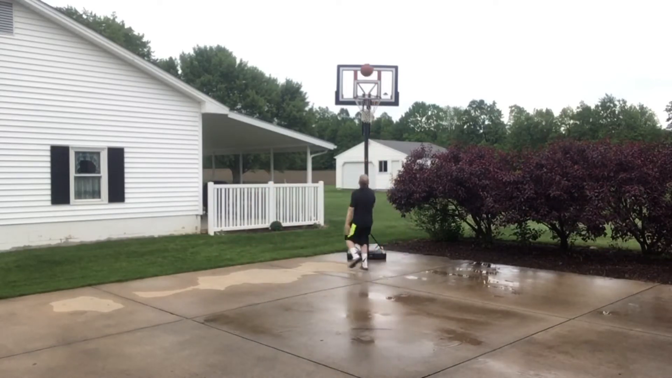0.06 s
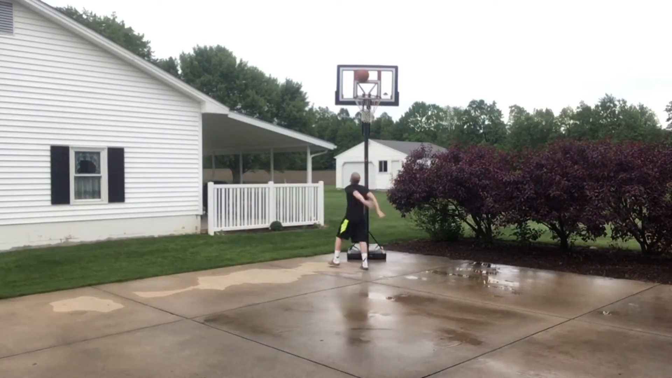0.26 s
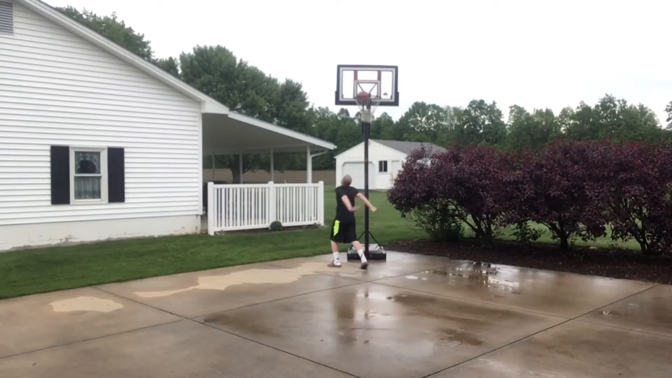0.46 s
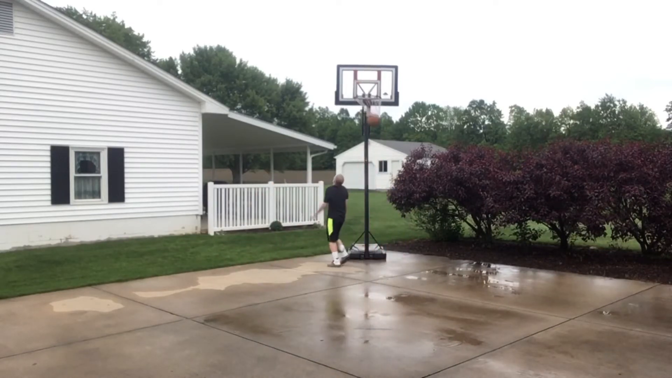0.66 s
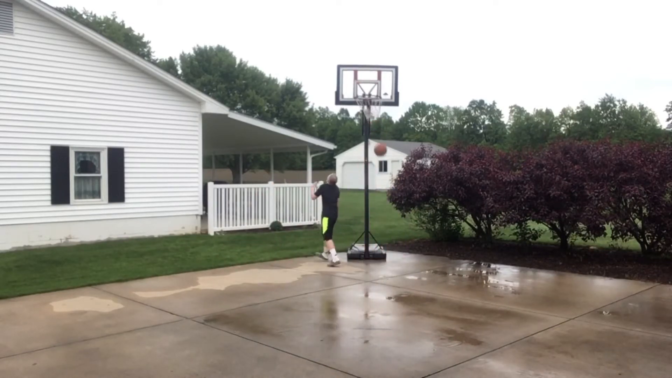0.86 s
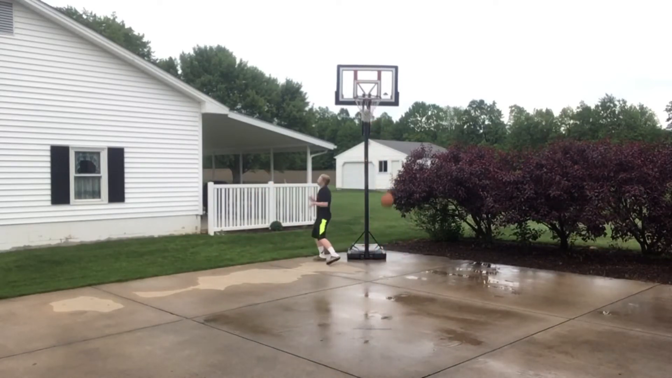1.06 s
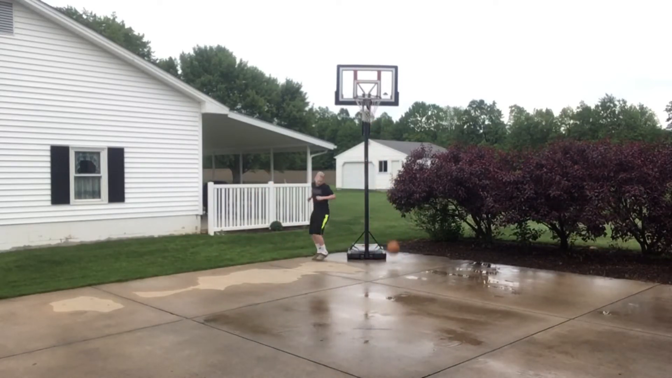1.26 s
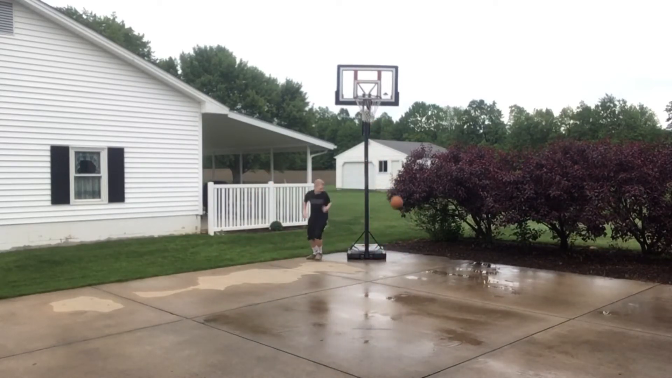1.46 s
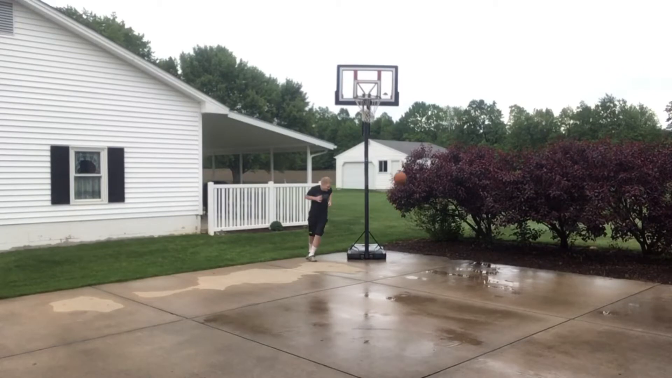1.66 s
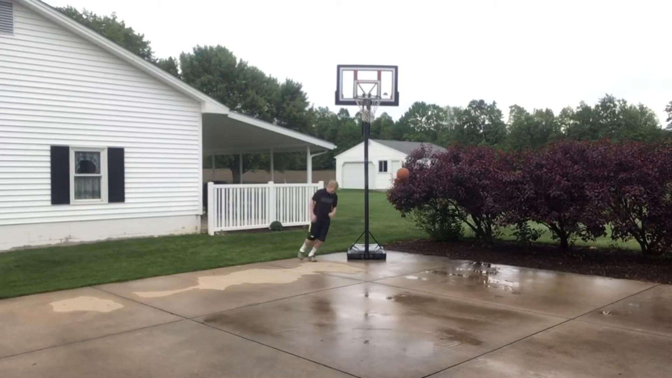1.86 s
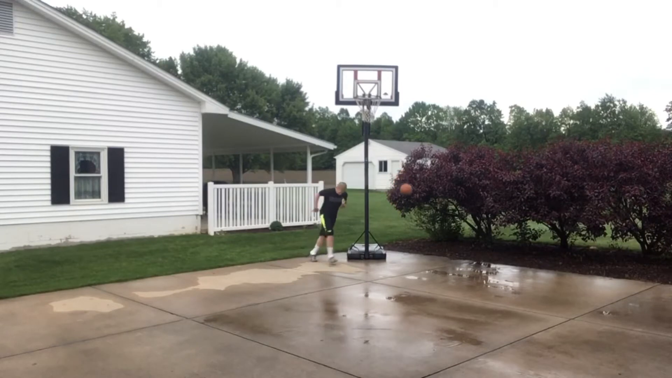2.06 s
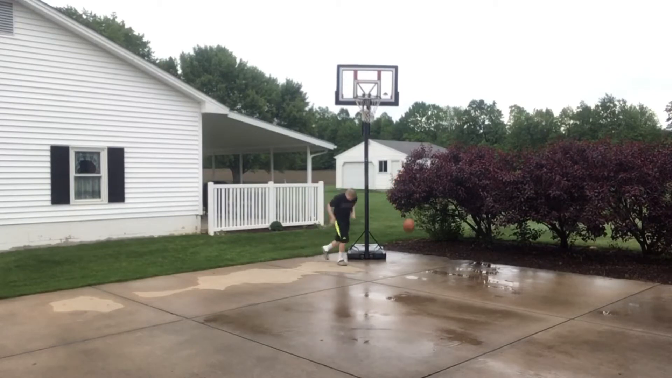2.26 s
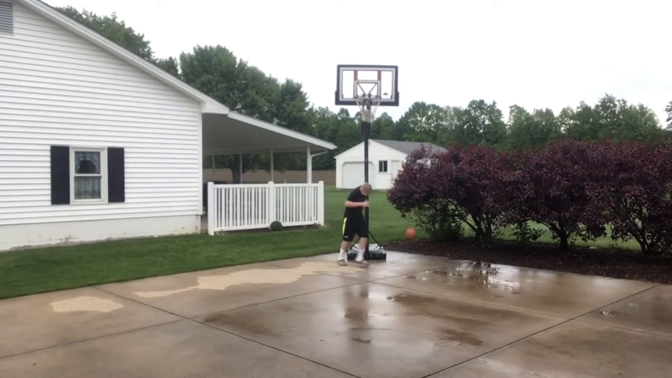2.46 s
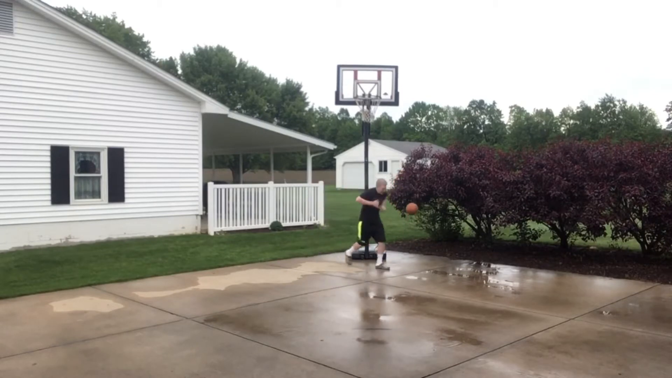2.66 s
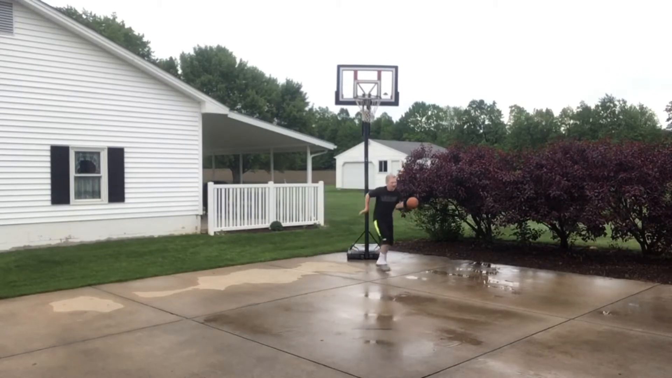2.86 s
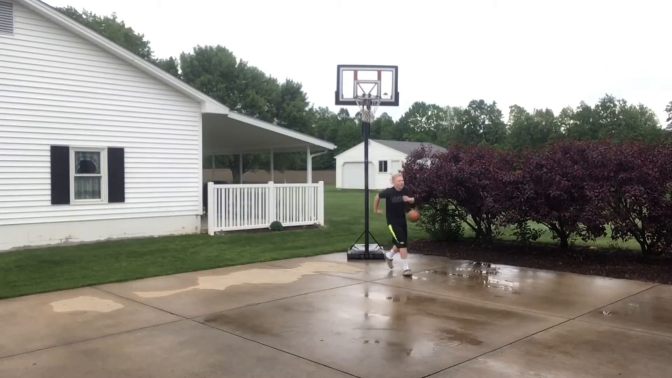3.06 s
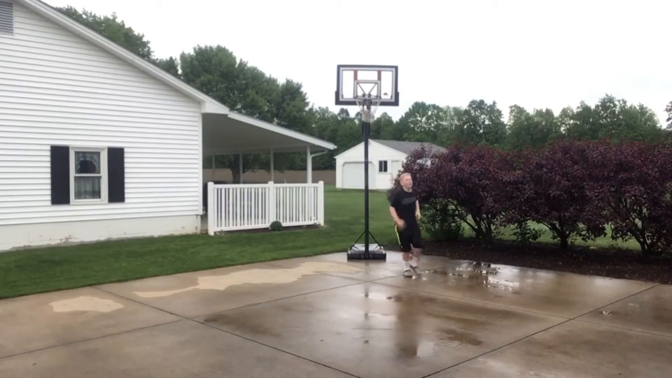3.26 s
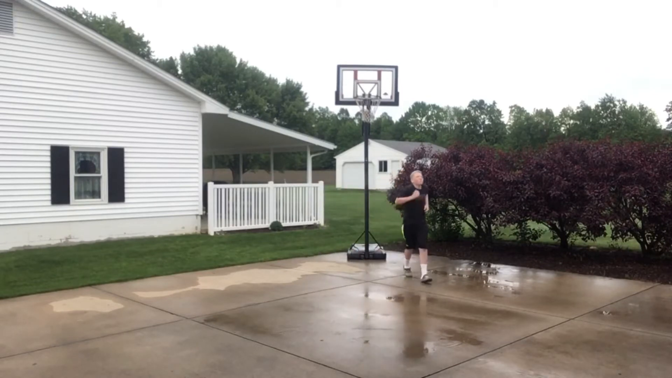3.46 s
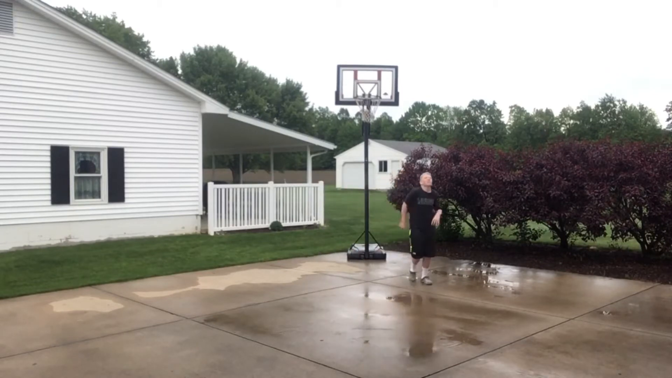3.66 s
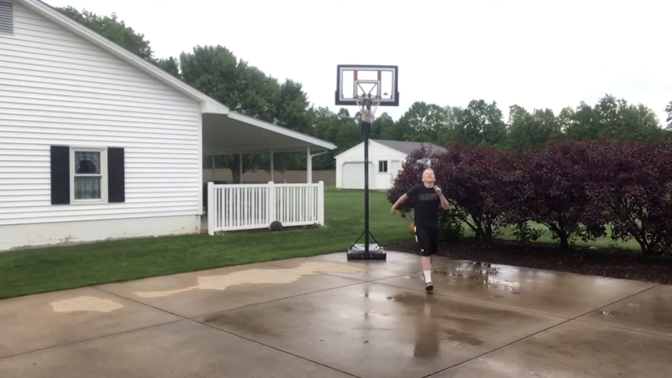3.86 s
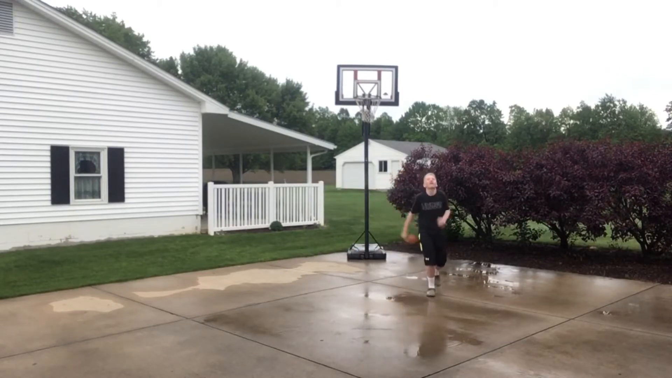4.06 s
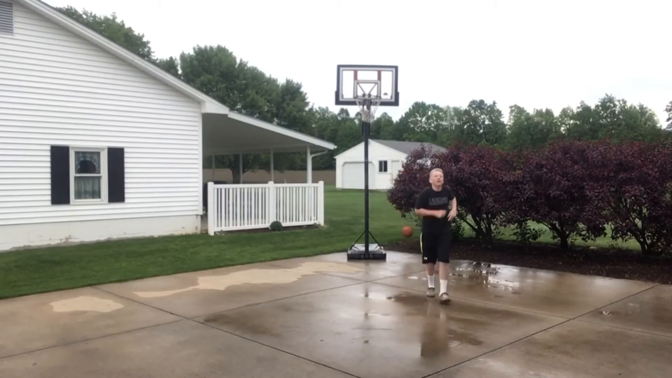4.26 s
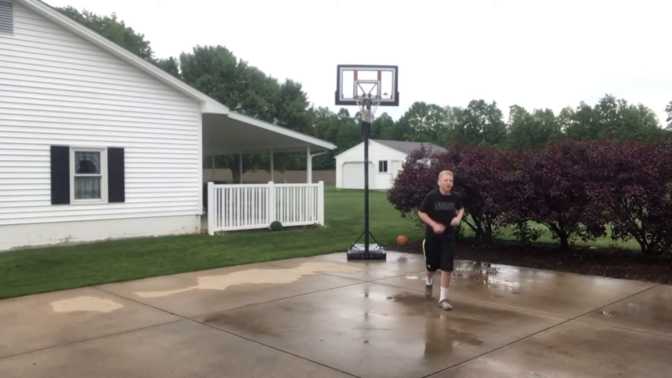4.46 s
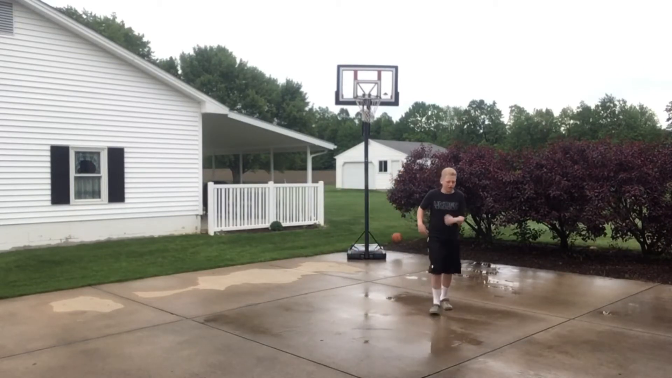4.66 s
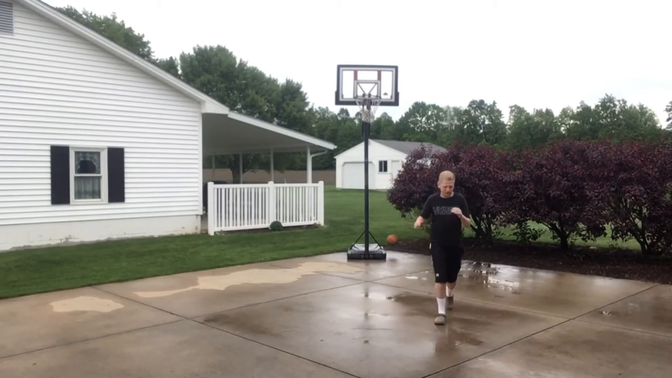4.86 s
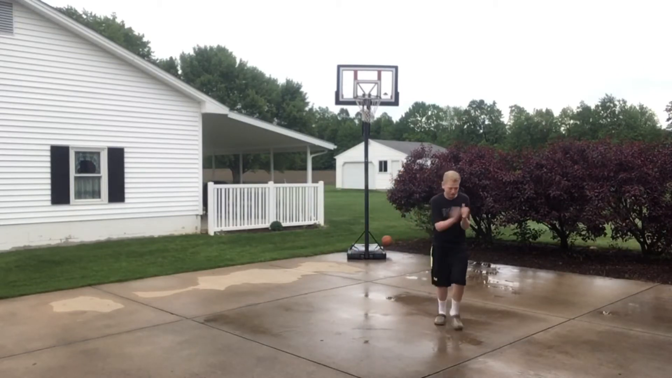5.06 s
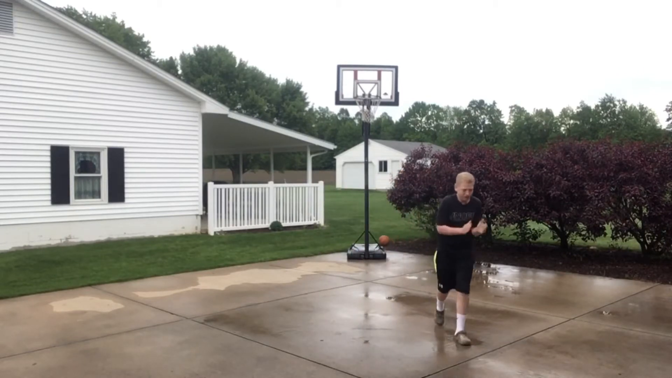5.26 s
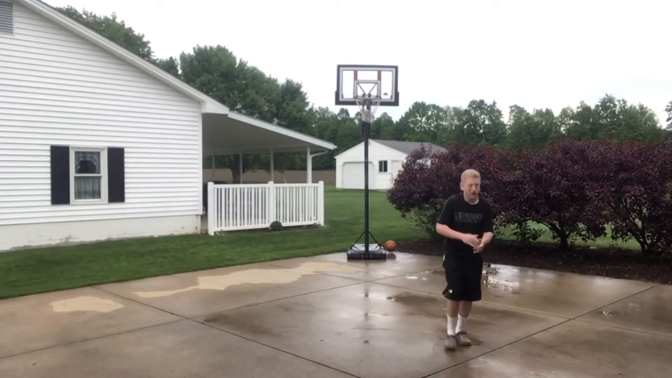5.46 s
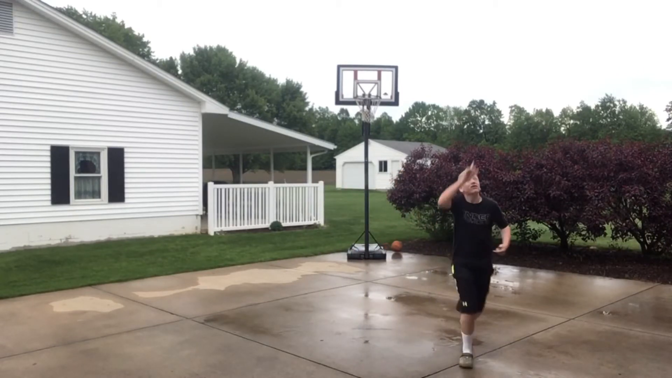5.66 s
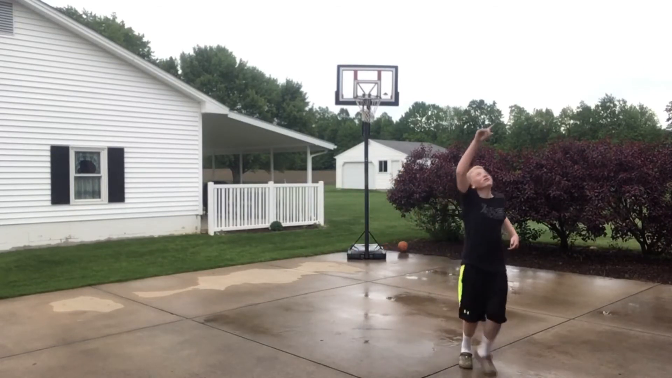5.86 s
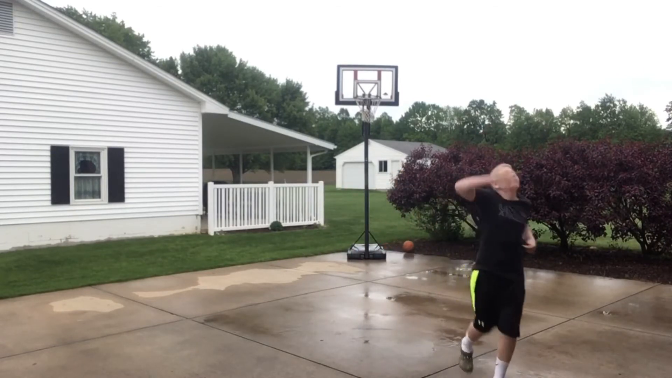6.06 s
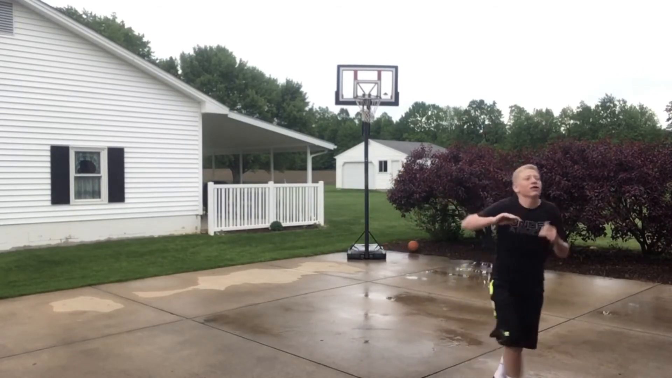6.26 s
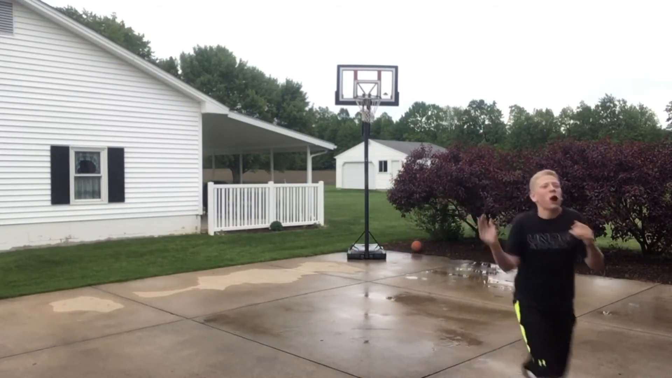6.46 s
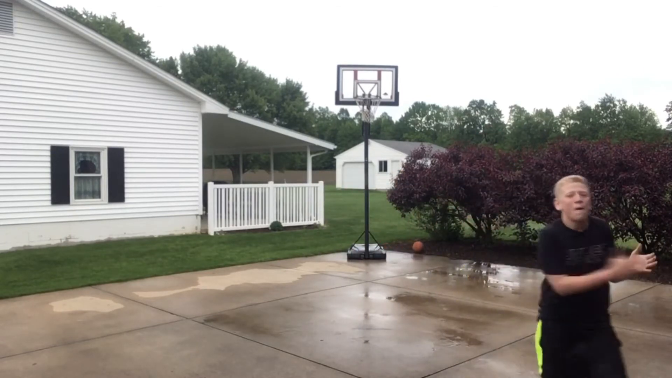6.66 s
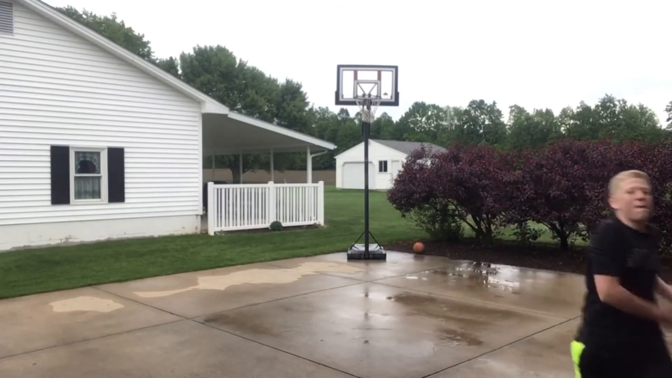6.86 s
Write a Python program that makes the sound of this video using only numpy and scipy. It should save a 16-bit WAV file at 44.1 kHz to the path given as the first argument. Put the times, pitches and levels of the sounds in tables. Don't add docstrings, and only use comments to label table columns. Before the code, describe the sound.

Open yard beside a house, heard from one fixed spot. First a distant board thud with loose metal rattle and a faint net brush, then a loud wet ball slap with quick echoes and progressively softer bounces. Shoes crunch grit, growing nearer and louder. Two popping hand claps echo off the walls, and a last crisp clap comes late. Far birds chirp above a wavering low hum and soft hiss.

```python
import sys
import numpy as np
from scipy import signal
from scipy.fft import rfft, irfft
from scipy.io import wavfile
from scipy.ndimage import map_coordinates

SR = 44100
rng = np.random.default_rng(int(sys.argv[2]) if len(sys.argv) > 2 else 0)


def undo_db(level):
    steps = np.asarray(level, float) / 20
    return 10 ** steps


def file_out(sig):
    cols = np.atleast_2d(sig).T
    lim = np.clip(cols, -1, 1)
    pcm = np.round(lim * 32767).astype(np.int16)
    wavfile.write(sys.argv[1], SR, pcm)


N = 305172
TIME = np.arange(N) / SR
SIZE = 2 ** 19
HZ = np.maximum(np.arange(SIZE // 2 + 1) * SR / SIZE, 1)


def noise():
    return rng.standard_normal(N)


def rms_one(x):
    return x / np.sqrt(np.mean(x ** 2) + 1e-30)


def at_hz(points, hz, column=1):
    points = np.array(points)
    return np.interp(np.log(hz), np.log(points[:, 0]), points[:, column])


def coloured(x, spectrum):
    cepstrum = irfft(np.log(undo_db(at_hz(spectrum, HZ[::64]))))
    cepstrum[1:4096] *= 2
    cepstrum[4097:] = 0
    response = irfft(np.exp(rfft(cepstrum)))
    return signal.oaconvolve(x, response / np.sqrt(np.sum(response ** 2)))[:N]


def clicks(seconds, db):
    out = np.zeros(N)
    out[(np.asarray(seconds) * SR).astype(int)] = undo_db(np.asarray(db))
    return out


def ring(seconds, db, modes, scatter_db, contact_hz):
    out = np.zeros(N)
    soft = np.exp(-2 * np.pi * contact_hz / SR)
    luck = rng.standard_normal((len(seconds), len(modes)))
    for k, (hz, level_db, t60) in enumerate(modes):
        r = undo_db(-60 / (t60 * SR))
        w = 2 * np.pi * hz / SR
        blows = clicks(seconds, db + level_db + scatter_db * luck[:, k])
        out += signal.lfilter([0, np.sin(w)], [1, -2 * r * np.cos(w), r * r], blows + 1e-18)
    return signal.lfilter([(1 - soft) ** 2], [1, -2 * soft, soft * soft], out)


def bursts(seconds, db, lengths, rise):
    out = np.zeros(N)
    for s, level_db, length in np.broadcast(seconds, db, lengths):
        at = int(s * SR)
        length = max(length, 2e-4)
        t = np.arange(min(int(8 * length * SR), N - at)) / SR / length
        out[at:at + len(t)] += undo_db(level_db) * (1 - np.exp(-t / rise)) * np.exp(-t)
    return out


def drift(rate):
    knots = rng.standard_normal(400)
    return map_coordinates(knots, [TIME * rate + 2], order=3)


def narrow(x, hz, width):
    r = np.exp(-np.pi * width / SR)
    return signal.lfilter([(1 - r * r) / 2, 0, (r * r - 1) / 2], [1, -2 * r * np.cos(2 * np.pi * hz / SR), r * r], x)


# time in seconds, level in dB.
MOTOR_SWELLS = [(0, -49), (.54, -51), (.71, -59), (1.12, -48.5), (1.27, -54), (1.48, -47.5), (1.73, -56),
                (2.03, -46.5), (2.51, -59), (2.85, -50), (3.24, -46), (3.49, -49), (3.7, -59),
                (3.99, -58.5), (4.28, -52.5), (4.86, -45.5), (5.32, -54), (6.42, -50.5)]
# pitch in Hz, level in dB, width in Hz.
MOTOR_OVERTONES = [(174.5, -69.5, 5.5), (339.3, -74, 4.1), (962.7, -72, 4.4), (1181, -76, 38)]
# frequency in Hz, level in dB per Hz.
RUMBLE_COLOUR = [(25, -43), (40, -7.5), (55, 18.5), (75, 3), (110, 8), (160, -8), (250, -39.5)]
# frequency in Hz, level in dB per Hz.
AIR_COLOUR = [(100, -24.5), (200, 0), (400, -3.5), (700, -4), (1100, -11.5), (1700, -17), (3000, -21),
              (4400, -22), (5500, -33), (6500, -31), (7900, -23.5), (9500, -31), (12000, -47.5),
              (16000, -76.5)]
# time in seconds, level in dB.
AIR_SWELLS = [(0, -61), (1, -63.5), (2, -63), (3, -64), (4, -65), (5, -62.5), (6, -61), (6.92, -63)]


def background():
    hum_db = np.interp(TIME, *np.transpose(MOTOR_SWELLS))
    rumble_db = -58.5 - 0.13 * (hum_db + 45)
    phase = 2 * np.pi * np.cumsum(84 + 0.64 * drift(5.4)) / SR
    hum = undo_db(hum_db + 1.5 + 0.55 * drift(11.0)) * np.sin(phase)
    overtones = sum(undo_db(db) * rms_one(narrow(noise(), hz, width)) for hz, db, width in MOTOR_OVERTONES)
    rumble = undo_db(rumble_db + 4.0) * coloured(noise(), RUMBLE_COLOUR)
    air_db = np.interp(TIME, *np.transpose(AIR_SWELLS)) + 1.0 * drift(39)
    return hum + overtones + rumble + undo_db(air_db) * coloured(noise(), AIR_COLOUR)


def whistles(calls, smear_hz, clear):
    out, white = np.zeros(N), noise()
    for s, length, hz, db, rise_hz in calls:
        at = int(s * SR)
        share = np.linspace(0, 1, int(length * SR))
        phase = 2 * np.pi * np.cumsum(hz + rise_hz * share) / SR
        blur = signal.lfilter(*signal.butter(2, smear_hz, fs=SR), white[at - 4000:at + len(share)])[4000:]
        swell = np.sqrt(np.sin(np.pi * share) + 1e-9)
        out[at:at + len(share)] += undo_db(db) * swell * np.sin(phase) * (clear + rms_one(blur))
    return out


# start in seconds, length in seconds, first pitch in Hz, level in dB, rise in Hz.
HELD_NOTES = [(.39, 0.032, 2790, -70, 5), (1.46, 0.16, 2800, -70.5, -18), (1.64, 0.25, 2810, -79.5, 1),
              (3.57, 0.14, 3170, -72, 28), (3.66, 0.16, 6240, -87, 0), (3.67, 0.12, 7260, -85, 12),
              (6.1, 0.16, 2954, -77, -54)]
RISING_CHIRPS = [(1.8, 0.067, 3180, -67, 150), (1.86, 0.1, 3430, -69, 450), (2.09, 0.059, 2860, -68, 1010),
                 (2.964, 0.24, 3020, -74.5, 574), (3.17, 0.1, 4320, -73, 990), (3.23, 0.13, 4700, -78, 690),
                 (6.26, 0.12, 2854, -67.5, 1000), (6.52, 0.4, 2850, -68.5, 1153)]
ROUGH_CHATTER = [(3.69, 0.23, 4020, -68.5, 341), (4.049, 0.11, 4350, -66.5, -750),
                 (4.279, 0.075, 3430, -71.5, 134)]


def birds():
    held = whistles(HELD_NOTES, smear_hz=27.7, clear=1.9)
    chirps = whistles(RISING_CHIRPS, smear_hz=172, clear=0.25)
    return held + chirps + whistles(ROUGH_CHATTER, smear_hz=523, clear=0)


# start in seconds, length in seconds, level in dB.
SHOE_ROLLS = [(0.974, 0.051, -51), (1.071, 0.027, -56), (1.174, .025, -47.5), (1.224, 0.058, -53),
              (1.56, 0.18, -59.5), (2.223, 0.032, -54.5), (2.645, 0.05, -51.5), (2.813, 0.014, -60),
              (3.061, 0.036, -45), (3.137, 0.0078, -46), (3.511, 0.041, -46), (3.571, 0.041, -53),
              (3.953, 0.016, -50.5), (3.979, 0.028, -47.5), (4.39, 0.043, -46), (4.462, 0.02, -49.5),
              (4.825, 0.052, -40.5), (5.033, 0.0068, -42), (5.3, 0.019, -40), (5.628, 0.029, -37),
              (5.705, 0.02, -47.5), (5.754, 0.0036, -48.5), (5.926, 0.016, -37.5), (5.991, 0.062, -35),
              (6.063, 0.059, -44.5), (6.4, 0.024, -54), (6.439, 0.015, -36), (6.546, .025, -59),
              (6.897, 0.016, -38)]
# start in seconds, level in dB.
SOLE_SCUFFS = [(4.622, -52), (5.2445, -32), (5.27, -40.5), (5.334, -37.5), (5.521, -36), (5.7534, -58),
               (5.796, -48.5)]
# time in seconds, level in dB.
STONE_SNAPS = [(3.085, -27), (4.61, -22.5), (4.855, -21.5), (5.929, -20), (6.077, -41.5), (6.9047, -18.5)]
# frequency in Hz, level in dB per Hz.
GRIT_COLOUR = [(1470, -25.5), (2500, -6), (3190, -7.5), (4300, -3.5), (5790, -13), (6640, -4), (8160, 4),
               (9080, -2.5), (10200, -8.5), (15500, -30.5)]
# frequency in Hz, level in dB per Hz.
SOLE_COLOUR = [(200, -23), (600, 1), (1500, 8), (2500, 7.5), (3500, -15), (5000, -29)]


def steps():
    tread = 0
    for s, length, db in SHOE_ROLLS:
        press = np.clip((TIME - s) / 0.0044, 0, 1)
        lift = np.exp(-np.maximum(TIME - s - length, 0) / 0.0058)
        tread = tread + undo_db(db) * press * lift
    tread = tread * undo_db(3.0 * drift(57))
    drag = bursts(*np.transpose(SOLE_SCUFFS), 0.018, rise=0.138)
    strength = undo_db(5.9 * np.minimum(rng.exponential(1, N), 4))
    grains = strength * (rng.random(N) < 4000 / SR) * rng.choice([-1, 1], N)
    grains = rms_one(grains) + 0.11 * noise()
    cracking = undo_db(-12.0) * (tread + undo_db(-7) * drag) * grains
    crunch = coloured(cracking + clicks(*np.transpose(STONE_SNAPS)), GRIT_COLOUR)
    return crunch + coloured(undo_db(-10.0) * (undo_db(-13.5) * tread + drag) * grains, SOLE_COLOUR)


# time in seconds, peak in dB, hollow of the palms in Hz, bright edge in dB, wall echo in dB.
HAND_CLAPS = [
    (5.1369, -4, 1300, -22, -5.5),
    (5.3819, -7.5, 1510, -20, -12),
    (6.7372, -11.5, 2010, -4.5, -44),
]
# frequency in Hz, level in dB per Hz.
PALM_COLOUR = [(200, -29.5), (400, -9), (550, -3), (860, -7.5), (1200, -0.5), (2200, -2), (2800, -11.5),
               (4500, -16.5), (7000, -23)]
# frequency in Hz, level in dB per Hz.
SKIN_COLOUR = [(2500, -13), (4500, -9.5), (6000, -12.5), (7800, -3), (10000, -11.5), (13000, -14.5),
               (16000, -44)]


def claps():
    out, wall, plain = np.zeros((3, N))
    for s, db, hz, edge_db, echo_db in HAND_CLAPS:
        echo_s = (17.1 + 2.6 * (s - HAND_CLAPS[0][0])) / 343
        closing = bursts([s - .004], db - 18, 0.0023, rise=1.1) * noise()
        puff = coloured(clicks([s], db + 9.5) + closing, PALM_COLOUR)
        pop = 0.92 * puff + 0.78 * narrow(puff, hz, width=2000)
        rub = bursts([s - .0015], db + edge_db + 8.0, 0.0014, rise=0.3) * noise()
        out += pop + coloured(clicks([s], db + edge_db + 14) + rub, SKIN_COLOUR)
        wall += undo_db(echo_db + 4) * np.roll(narrow(pop, hz, width=800), int(echo_s * SR))
        plain += coloured(clicks([s], db + 12), PALM_COLOUR)
        plain += coloured(clicks([s], db + edge_db + 16.5), SKIN_COLOUR)
    return out, wall, plain


# time in seconds, then board, stand and rattle levels in dB.
HOOP_KNOCKS = [
    (0.281, -17, -44, -34),
    (0.313, -29, -25.5, -55),
    (0.353, -44, -32, -72),
    (0.384, -33.5, -31.5, -56),
    (0.521, -41, -38.5, -49),
    (0.611, -45.5, -34.5, -56),
    (0.858, -46.5, -50.5, -84),
]
# pitch in Hz, level in dB, time to fade by 60 dB in seconds.
BOARD_MODES = [(259, -4, 0.098), (278, 1, 0.065), (348, -7.5, 0.07), (569.6, -14, 0.11), (695, -22, 0.12),
               (805, -12, 0.032)]
STAND_MODES = [(51.6, -3.5, 0.83), (108, -3.5, 1), (132, -23, 0.2), (158, -4.5, 0.23), (177, -6.5, 0.12)]
# frequency in Hz, level in dB per Hz.
RATTLE_COLOUR = [(290, -8.5), (500, -18.5), (646, -12), (859, -25.5), (1300, -21), (4050, -36), (5620, -43),
                 (7580, -43.5), (15000, -73)]
# start in seconds, length in seconds, level in dB.
NET_BRUSHES = [
    (0.303, 0.018, -56.5),
    (0.337, 0.096, -63),
    (0.42, 0.34, -66),
]
# time in seconds, level in dB, length in seconds.
RIM_BUZZES = [
    (0.631, -54, 0.027),
    (0.863, -52.5, 0.011),
]


def hoop():
    s, board_db, stand_db, rattle_db = np.transpose(HOOP_KNOCKS)
    board = ring(s, board_db - 5, BOARD_MODES, scatter_db=0.0, contact_hz=406)
    stand = ring(s, stand_db, STAND_MODES, scatter_db=2.0, contact_hz=250)
    rattle = coloured(bursts(s, rattle_db, 0.041, rise=0.01) * noise(), RATTLE_COLOUR)
    brush = sum(undo_db(db) * np.sin(np.pi * np.clip((TIME - s) / length, 0, 1)) for s, length, db in NET_BRUSHES)
    net = coloured(brush * undo_db(1.1 * drift(30.2)) * noise(), GRIT_COLOUR)
    shiver = bursts(*np.transpose(RIM_BUZZES), rise=0.44) * rms_one(narrow(noise(), 1480, width=300))
    return board + stand + rattle + shiver + net


# time in seconds, slap peak in dB, thump in dB, ring of the air inside in dB.
BALL_BOUNCES = [
    (1.297, -1, -24, -22),
    (2.4416, -9, -25.5, -32.5),
    (3.3438, -16, -37, -37),
    (4.0712, -31, -40.5, -34),
    (4.5975, -30.5, -41, -39.5),
    (5.0304, -25, -45.5, -48.5),
]
# frequency in Hz, level in dB per Hz.
SLAP_COLOUR = [(200, -29.5), (400, -5), (1200, -6), (2500, -6), (4300, -10), (6000, -12.5), (8000, -8),
               (10000, -17), (13000, -35.5), (16000, -60.5)]
# pitch in Hz, level in dB, time to fade by 60 dB in seconds.
SQUASH_MODES = [(101, -0.5, 0.14), (140.7, 0, 0.1), (213, -23.5, 0.08)]
INNER_AIR_MODES = [(450, -3, 0.049), (654, 0.5, 0.024), (1171, -7.5, 0.03), (1322, -11, 0.053),
                   (1636, 4.5, 0.0061), (2230, -2, 0.015)]


def bounces():
    s, slap_db, thump_db, air_db = np.transpose(BALL_BOUNCES)
    s = s + 0.00065
    slap = clicks(s, slap_db + 2) - clicks(s + .0005, slap_db - 12)
    spray = bursts(s, slap_db - 28.5, 0.018, rise=0.026) * noise()
    thump = ring(s, thump_db + 4.5, SQUASH_MODES, scatter_db=6.0, contact_hz=511)
    ping = ring(s, air_db - 4, INNER_AIR_MODES, scatter_db=1.5, contact_hz=5070)
    return coloured(slap, SLAP_COLOUR) + coloured(spray, GRIT_COLOUR) - thump + ping


# frequency in Hz, level in dB, time to fade by 60 dB in seconds.
SCATTERING = [(101, -2.5, 0.78), (310.5, 8.5, 0.25), (1223, 3, 0.65), (2410, -2, 0.69), (5000, -6, 0.72),
              (9000, -9, 0.68), (15040, -4.5, 0.54)]


def yard(x, scattered, echoes, scatter_db):
    path, tail = 1, 0
    t = TIME[:SR]
    for s, db, hz, breadth in echoes:
        damping = 1j * HZ / hz * breadth
        wall_colour = (damping / (1 + damping - (HZ / hz) ** 2)) ** 2
        path = path + undo_db(db) * np.exp(-2j * np.pi * HZ * s) * wall_colour
    edges = 50 * 2 ** np.arange(0, 8.6, .5)
    early = undo_db(13.0 - 60 * t / 0.044)
    for low, high in zip(edges, edges[1:]):
        half_octave = signal.butter(2, [low, high], "band", fs=SR, output="sos")
        band = signal.sosfilt(half_octave, rng.standard_normal(SR))
        hz = np.sqrt(low * high)
        late = undo_db(-60 * t / at_hz(SCATTERING, hz, column=2))
        tail = tail + band * undo_db(at_hz(SCATTERING, hz)) * (early + late)
    tail = tail * (1 - np.exp(-t / 0.0012))
    direct = rfft(x, SIZE) * path
    return irfft(direct + rfft(scattered, SIZE) * undo_db(scatter_db) * rfft(tail, SIZE))[:N]


# delay in seconds, level in dB, centre in Hz, breadth as a share of the centre.
WALLS_FROM_BALL = [(0.0275, -11, 2400, 2.5), (.066, -4, 1600, 0.8), (.077, -10, 1550, 0.8),
                   (0.07, -6, 110, 2.5), (.14, -19, 1350, 0.7)]
ECHOES_FROM_PLAYER = [(.002, -2, 1900, 2.8), (.0043, -5, 1600, 2.8), (.009, -11, 1800, 2.3),
                      (.416, -30.5, 2100, 0.55)]


def scene():
    hands, wall, plain = claps()
    shoes = steps()
    far = birds() + hoop() + bounces()
    far = yard(far, far, WALLS_FROM_BALL, scatter_db=-39.5)
    near = yard(hands + shoes, plain + shoes, ECHOES_FROM_PLAYER, scatter_db=-42)
    return (background() + far + near + wall)[None]


def top_cut(x):
    return signal.sosfilt(signal.butter(12, 16500, fs=SR, output="sos"), x)


def record(dry):
    rounded = 0.85 * np.tanh(dry / 0.85)
    thin = signal.sosfilt(signal.butter(4, 42, "high", fs=SR, output="sos"), rounded)
    cut = signal.sosfilt(signal.cheby2(12, 60, 16300, fs=SR, output="sos"), thin)
    return top_cut(cut)


dry = scene()
out = record(dry)
file_out(out)
```